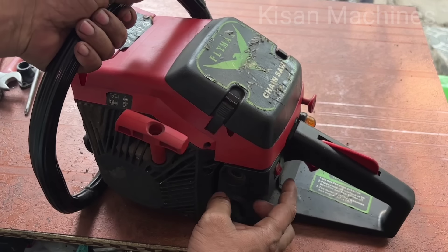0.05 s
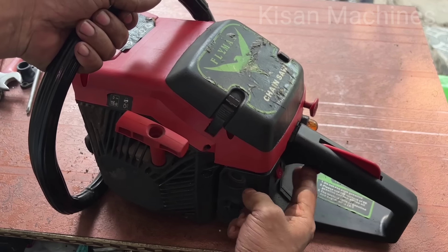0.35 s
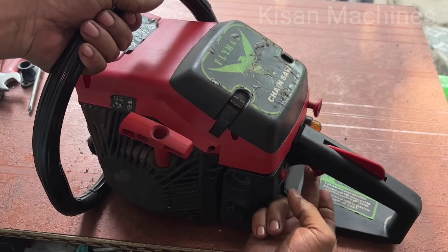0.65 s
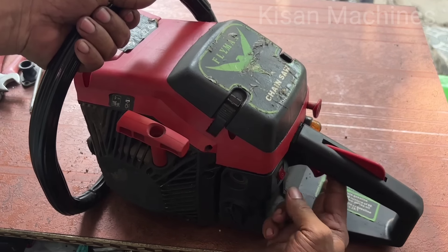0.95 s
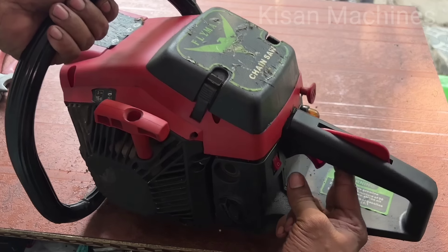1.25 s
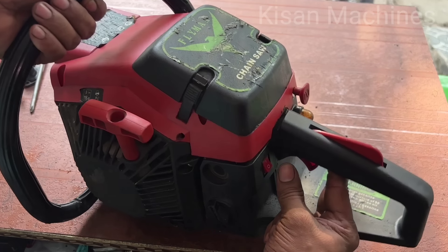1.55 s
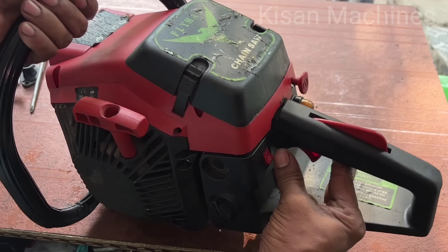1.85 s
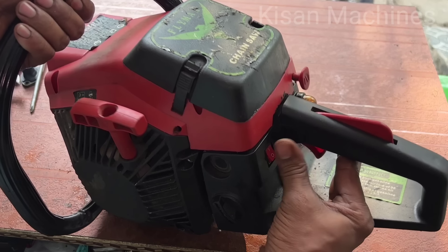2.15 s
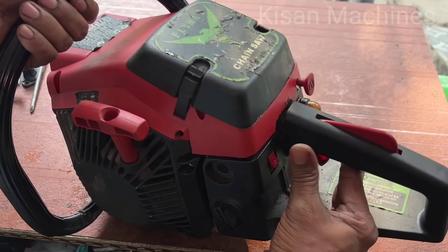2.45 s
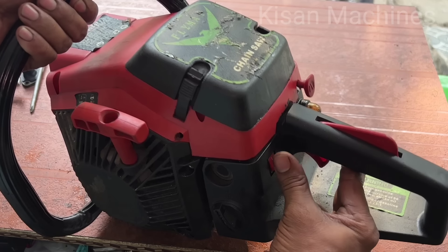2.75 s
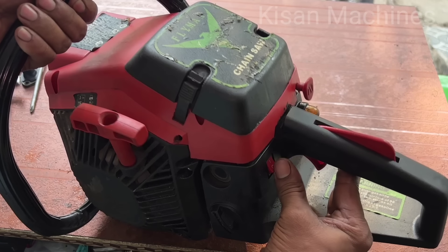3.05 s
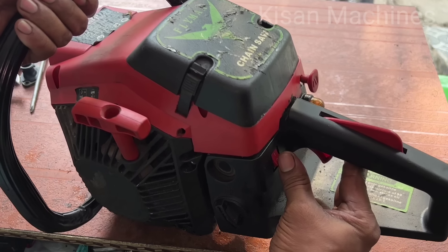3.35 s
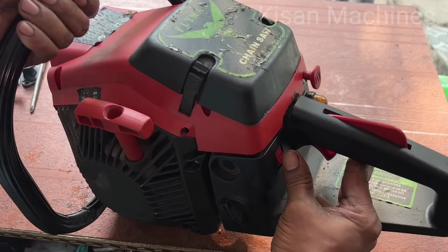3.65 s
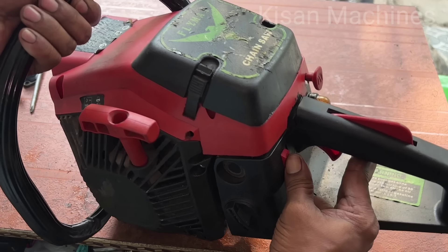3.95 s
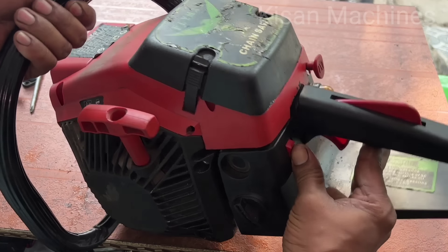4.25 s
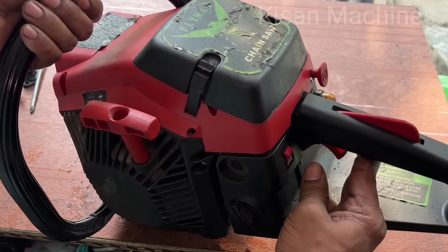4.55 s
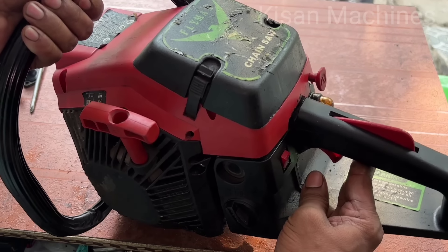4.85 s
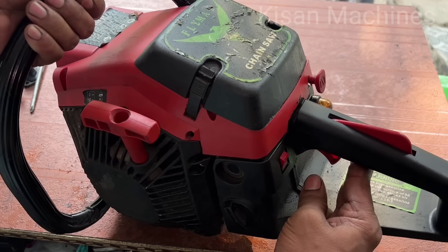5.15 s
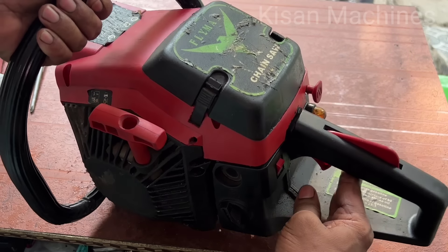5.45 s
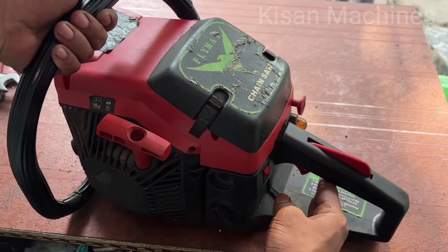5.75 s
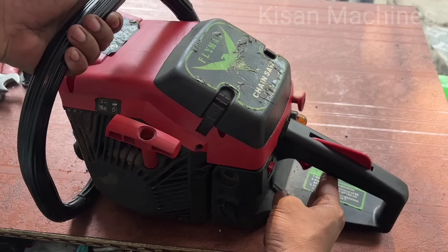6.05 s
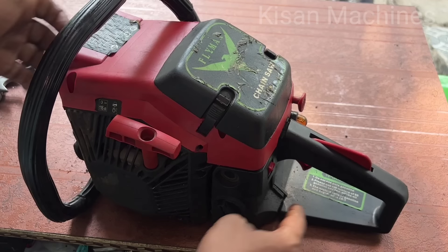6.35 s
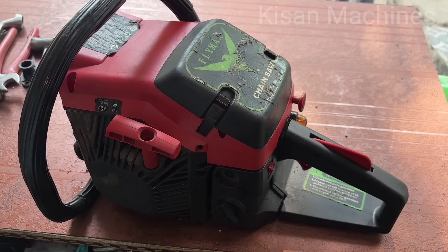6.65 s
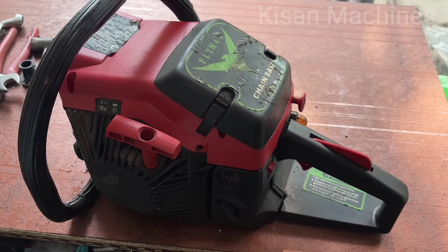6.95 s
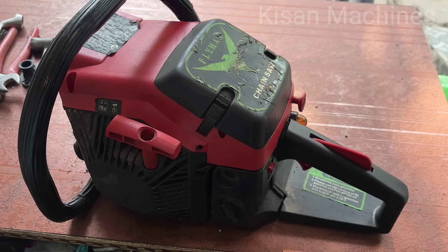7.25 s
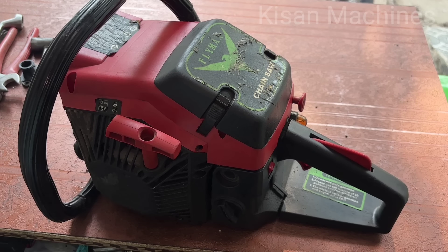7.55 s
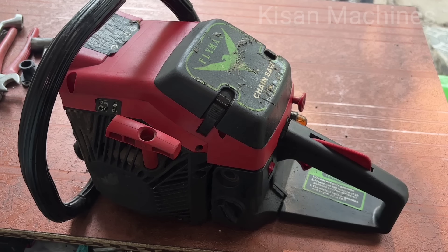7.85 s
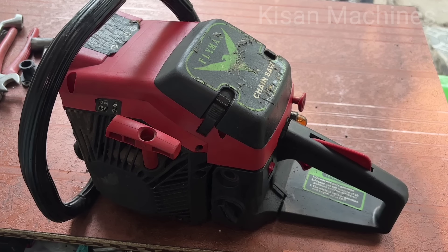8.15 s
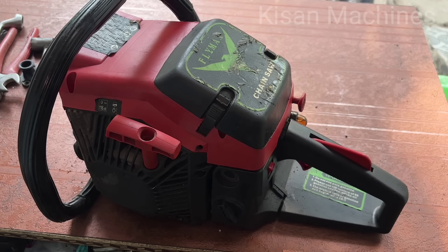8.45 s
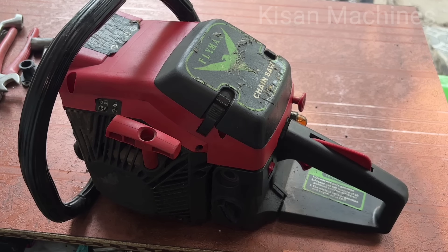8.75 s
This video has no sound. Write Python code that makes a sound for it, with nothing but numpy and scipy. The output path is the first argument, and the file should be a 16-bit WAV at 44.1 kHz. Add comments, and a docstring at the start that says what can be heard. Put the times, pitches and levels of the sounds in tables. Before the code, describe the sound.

Heard up close in a workshop, a chainsaw engine ticks over with a loping, clattering beat. The ignition is cut just before halfway, and the engine gulps air, drops in pitch and halts. Its loose clutch drum coasts on, rattling and ringing lightly. The saw is lowered onto the bench with a thud, and the rattle carries on with small irregular knocks above a low rumble.

```python
"""A two-stroke chainsaw idles close by on a workshop bench: it puffs through its muffler on every turn,
fires on every second or third, and clatters; its housing hops and makes the bench boom at first.
The ignition is cut, the crank pumps air, slows to a last compression and rocks back.
The free clutch drum coasts on, rattling on its bearing and ringing at its rim.
After soft handling bumps the saw is let down on the bench with a thud. A dull rumble lies underneath."""
import sys
import numpy as np
from scipy import signal
from scipy.fft import rfft, irfft, next_fast_len
from scipy.io import wavfile
from scipy.ndimage import map_coordinates

SR = 44100
rng = np.random.default_rng(int(sys.argv[2]) if len(sys.argv) > 2 else 0)


def generate_wav(sig):
    """Save sig (samples, or channels by samples) to the path in sys.argv[1] as 16-bit PCM at SR."""
    pcm = np.round(np.clip(np.atleast_2d(sig).T, -1, 1) * 32767).astype(np.int16)
    wavfile.write(sys.argv[1], SR, pcm)


N = 397323

CUT_S, LAST_COMPRESSION_S, REBOUND_S = 3.942, 4.294, 4.448
SET_DOWN_S, SET_DOWN_LENGTH_S = 5.67, 0.38
PUFF_DB, REBOUND_DB = -35.5, -8.5


def amp(db):
    """Decibels to gain."""
    return 10 ** (np.asarray(db) / 20)


def unit(x):
    """Scaled to rms 1."""
    return x / np.sqrt(np.mean(x ** 2) + 1e-20)


def along(points, hz):
    """Interpolates (frequency, value) points on a log axis."""
    f, v = np.transpose(points)
    return np.interp(np.log(hz + 1), np.log(f + 1), v)


def clock():
    """Sample times in seconds."""
    return np.arange(N) / SR


def ramp(start_s, length_s):
    """Rises from 0 to 1."""
    return np.clip((clock() - start_s) / length_s, 0, 1)


def wobble(rate_hz):
    """Smooth random curve with knots at rate_hz."""
    return map_coordinates(rng.standard_normal(int(N * rate_hz / SR) + 4), [clock() * rate_hz])


def spread(times):
    """One Gaussian draw per event."""
    return rng.standard_normal(len(times))


def filtered(x, response):
    """Applies a frequency response."""
    m = next_fast_len(N + SR // 2)
    return irfft(rfft(x, m) * response(np.fft.rfftfreq(m, 1 / SR)), m)[..., :N]


def body(x, colour, modes, size=8192):
    """Minimum-phase filter: resonances on a broad colour; white input keeps its power."""
    hz = np.fft.rfftfreq(size, 1 / SR)
    peaks_db = sum(rise / (1 + ((hz - centre) / width) ** 2) for centre, width, rise in modes)
    cepstrum = irfft(np.log(amp(along(colour, hz) + peaks_db)))[:size // 2]
    response = irfft(np.exp(rfft(2 * cepstrum, size)))
    return signal.fftconvolve(x, response / np.linalg.norm(response))[:N]


def taps(times, sizes):
    """Impulses of given sizes."""
    return np.bincount(np.clip(np.round(times * SR).astype(int), 0, N - 1), sizes, N)


def fade(x, life_s):
    """Gives each impulse an exponential tail."""
    return signal.lfilter([1], [1, -np.exp(-1 / (life_s * SR))], x)


def bursts(impulses, life_s):
    """Turns each impulse into a dying noise burst of equal energy."""
    return fade(impulses, life_s) * rng.standard_normal(N) * np.sqrt(2 / (life_s * SR))


def scattered(impulses, life_s):
    """Sends each impulse along the same short paths through the housing; energy is kept."""
    t = np.arange(SR // 16) / SR
    paths = rng.standard_normal(len(t)) * np.exp(-t / life_s)
    return signal.fftconvolve(impulses, paths / np.linalg.norm(paths))[:N]


def turn_times(speed_hz, through_s):
    """Times of whole turns, one of them at through_s."""
    turns = np.cumsum(speed_hz) / SR
    turns -= np.interp(through_s, clock(), turns)
    return np.interp(np.arange(np.ceil(turns[0]), turns[-1]), turns, clock())


def swell_db(db_per_s=1.2539):
    """The engine grows louder until the cut."""
    return db_per_s * np.minimum(clock(), CUT_S)


# Hunting idle: (time [s], crank speed [Hz])
IDLE_SPEED = [(0, 60.5), (.3, 61.7), (.6, 60), (.85, 61.4), (1.05, 62.6), (1.42, 61.8), (1.62, 58.8),
              (1.9, 61.2), (2.3, 60), (2.76, 64.3), (3.2, 60.5), (3.42, 61.3), (3.9, 60.9)]
# Turns that fire: (time [s], share [0-1])
FIRING_SHARE = [(0, .37), (.5, .38), (.65, .5), (.92, .5), (1.2, .4), (1.65, .34), (1.9, .44), (2.2, .46),
                (2.4, .33), (2.9, .38), (3.05, .5), (3.2, .46), (3.35, .34), (3.9, .43)]


def engine(brake_hz_per_s=131, escape_s=0.0024, jitter_s=.00009):
    """The crank idles, brakes evenly after the cut and rocks back once; its turns drive the parts."""
    t = clock()
    braking_s = np.clip(t - CUT_S, 0, LAST_COMPRESSION_S - CUT_S)
    speed_hz = np.interp(t, *np.transpose(IDLE_SPEED)) - brake_hz_per_s * braking_s
    times = turn_times(speed_hz, LAST_COMPRESSION_S)
    # trapped air escapes just after the piston turns back
    escapes = np.array([LAST_COMPRESSION_S, REBOUND_S]) + escape_s
    times = np.append(times[times < LAST_COMPRESSION_S - .01], escapes)
    running = times < CUT_S
    # charge builds turn by turn and burns when there is enough
    share = np.interp(times, *np.transpose(FIRING_SHARE))
    fired = (np.diff(np.floor(np.cumsum(share)), prepend=0) > 0) & running
    size = np.sqrt(SR / np.interp(times, t, speed_hz))
    powered = size * running
    times = times + jitter_s * spread(times)
    gas = exhaust(times, powered, fired, share) + pumping(times[~running], speed_hz)
    return (muffler_delay(gas) + port_pops(times, powered, fired)
            + casing(times, size, fired) + housing_hops(times, powered, fired))


# Muffler: (frequency [Hz], gain [dB])
MUFFLER_COLOUR = [(25, -59), (60, -14), (120, -11), (180, -4), (300, -4), (380, -10), (490, -13.5),
                  (650, -12), (720, -17.5), (950, -25.5), (1200, -26), (1500, -31.5), (2200, -53),
                  (4000, -36.5), (12000, -86)]
# Muffler resonances: (centre [Hz], half-width [Hz], rise [dB])
MUFFLER_MODES = [(295, 45, 2), (424, 22, 8), (550, 22, 12), (636, 25, 8), (765, 20, 4), (853, 14, 12),
                 (1040, 22, 13), (1095, 20, 5)]
# What a firing adds to a puff: (frequency [Hz], gain [dB])
LOPE_COLOUR = [(60, -5), (130, -4), (290, 7.5), (450, 6.5), (650, 2), (1100, -11)]
# Lead of a firing over the puff: (frequency [Hz], phase [rad])
LOPE_PHASE = [(130, 1.5), (230, 1.0), (330, 1.0), (450, 1.6), (650, 1.8)]


def exhaust(times, size, fired, share, scatter_db=.9, roughness=0.25):
    """One puff a turn, with gas noise, rings the muffler; the firings make the idle lope."""
    puffs = taps(times, size * amp(scatter_db * spread(times)))
    firings = taps(times, size * (fired - share))
    lope = filtered(firings, lambda hz: np.exp(1j * along(LOPE_PHASE, hz)) * amp(along(LOPE_COLOUR, hz)))
    gas = puffs + lope + roughness * bursts(puffs, life_s=.01)
    return amp(PUFF_DB + swell_db()) * body(gas, MUFFLER_COLOUR, MUFFLER_MODES)


# Muffler chambers: (centre [Hz], width [Hz])
CHAMBERS = [(280, 75), (480, 570), (800, 360)]


def muffler_delay(gas):
    """Each chamber delays sound near its resonance, so a puff swells over a few cycles."""
    def lag_rad(hz):
        return 2 * sum(np.angle(centre ** 2 - hz ** 2 + 1j * hz * width) for centre, width in CHAMBERS)
    return filtered(gas, lambda hz: np.exp(-1j * lag_rad(hz)))


def port_pops(times, size, fired, relative_db=-16, fired_db=3):
    """The exhaust port pops open on each powered turn, harder on a firing."""
    openings = taps(times, size * amp(fired_db * fired))
    blasts = .6 * scattered(openings, 0.005) + .7 * bursts(openings, 0.008)
    pops = body(blasts, MUFFLER_COLOUR, modes=[(1473, 440, 17.6)])
    return amp(PUFF_DB + swell_db() + relative_db) * pops


# Casing hiss: (frequency [Hz], gain [dB])
CASING_COLOUR = [(200, -5), (700, 23), (1200, 10), (1900, -5), (2500, 4), (3600, 3), (5000, 1.5), (6000, 1),
                 (7500, -4), (10000, -1), (15000, -9.5)]
# Casing resonances: (centre [Hz], half-width [Hz], rise [dB])
CASING_MODES = [(1876, 260, 19.1), (3247, 170, 9.3), (3525, 28, 7.5), (3744, 13, 9.6), (4220, 71, 5),
                (5200, 130, 10.6), (7530, 88, 6.8), (7450, 44, 3.4)]


def casing(times, size, fired, start_db=-46.5, slap_gain=0.54, scatter_db=2.5, fired_db=3.5):
    """Steady rush of the flywheel fan and bursts of piston slap ring the casing."""
    fan = 0.77 * rng.standard_normal(N) * (1 - ramp(LAST_COMPRESSION_S, 0.52))
    impacts = taps(times, size * amp(scatter_db * spread(times) + fired_db * fired - 1.5))
    slap = slap_gain * (.5 * scattered(impacts, 0.013) + 1.05 * bursts(impacts, 0.012))
    braking_db = -6 * ramp(CUT_S, LAST_COMPRESSION_S - CUT_S)
    rebound_db = REBOUND_DB * ramp(LAST_COMPRESSION_S, REBOUND_S - LAST_COMPRESSION_S)
    level_db = start_db + swell_db() + braking_db + rebound_db
    return amp(level_db) * body(fan + slap, CASING_COLOUR, CASING_MODES)


# Hopping of the housing: (time [s], level [dB])
HOP_LEVEL = [(0, -40.5), (.55, -40), (.8, -36), (.98, -37.5), (1.25, -44), (1.7, -44.5)]
# Housing on the bench: (frequency [Hz], gain [dB])
HOUSING_COLOUR = [(30, -13), (70, -9.5), (120, 1.5), (200, -1), (320, 4.5), (700, -8.5), (1300, -10.5),
                  (2000, -25.5), (4000, -25.5), (12000, -36.5)]
# Housing resonance: (centre [Hz], half-width [Hz], rise [dB])
HOUSING_MODES = [(1735, 40, 15.3)]


def housing_hops(times, size, fired, fired_db=4):
    """The housing lands and buzzes on the bench, harder after a firing, less as the grip tightens."""
    hop = spread(times)
    landings = taps(times + .004 + .0003 * hop, size * amp(.5 * hop + fired_db * fired))
    buzz = .6 * landings + .8 * bursts(landings, .009)
    return amp(np.interp(clock(), *np.transpose(HOP_LEVEL))) * body(buzz, HOUSING_COLOUR, HOUSING_MODES)


# Bench note: (time [s], frequency [Hz], level [dB])
BOOM_NOTE = [(0, 120.6, -42.5), (.65, 110, -50.5), (1.08, 108.6, -41), (1.22, 79, -45), (1.33, 72, -67)]


def bench_boom(width_hz=22):
    """The loosely held saw makes the bench boom; the note sinks and dies as the grip tightens."""
    s, hz, db = np.transpose(BOOM_NOTE)
    angle = 2 * np.pi * np.cumsum(np.interp(clock(), s, hz)) / SR
    note = unit(wobble(width_hz) * np.cos(angle) + wobble(width_hz) * np.sin(angle))
    return note * amp(np.interp(clock(), s, db)) * (1 - ramp(s[-1], .1))


# Hardest bearing knocks: (time [s], level [dB])
BEARING_KNOCKS = [(5.19, -43), (5.222, -41), (5.62, -39), (6.18, -40), (6.25, -43), (6.299, -42),
                  (6.447, -43), (6.627, -42), (6.757, -42), (6.919, -39), (6.989, -38), (7.071, -40),
                  (7.133, -39), (7.208, -38), (7.441, -38), (7.529, -37), (7.614, -38), (7.689, -37),
                  (7.838, -42), (7.928, -40), (7.986, -40), (8.058, -41), (8.2, -40), (8.262, -42),
                  (8.321, -41), (8.496, -40), (8.522, -41), (8.575, -42), (8.73, -39), (8.824, -40),
                  (8.894, -40)]
# Bearing rattle: (frequency [Hz], gain [dB])
RATTLE_COLOUR = [(100, -18), (250, -3), (600, -13.5), (1000, -16.5), (1400, -15.5), (2300, -15),
                 (3500, -21), (6000, -9), (14000, -76)]
# Rattle resonances: (centre [Hz], half-width [Hz], rise [dB])
RATTLE_MODES = [(476.3, 81.4, 27.6), (861.5, 198, 27.8), (1817, 190, 26), (2264, 105, 17.6), (2780, 93, 15),
                (2930, 72, 21.6)]


def bearing_rattle(contacts, speed_hz, held_db=-57.5, resting_db=-52, knock_db=18, dull_hz=1570):
    """The drum rolls and knocks on its bearing; after the set-down the bench carries the rattle."""
    rolling = 0.23 * contacts + 0.84 * bursts(contacts, 0.011) + 0.73 * rng.standard_normal(N)
    # slower contacts are softer and lose treble
    soft = filtered(rolling, lambda hz: 1 / (1 + (hz / dull_hz) ** 4))
    rolling = soft + speed_hz / 33 * (rolling - soft)
    s, db = np.transpose(BEARING_KNOCKS)
    blows = taps(s, amp(db + knock_db))
    knocks = .45 * blows + .75 * bursts(blows, .008)
    rolling_db = held_db + (resting_db - held_db) * ramp(SET_DOWN_S, SET_DOWN_LENGTH_S)
    return body(amp(rolling_db) * rolling + knocks, RATTLE_COLOUR, RATTLE_MODES)


# Steel rim: (frequency [Hz], gain [dB])
RIM_COLOUR = [(2000, 2.5), (4000, -1.5), (9000, -13.5), (15000, -24)]
# Rim resonances: (centre [Hz], half-width [Hz], rise [dB])
RIM_MODES = [(4220, 63, 6.6), (4530, 65, 3), (5080, 190, 19), (7040, 160, 23.9), (7700, 180, 8),
             (9160, 230, 15), (13650, 850, 16)]


def rim_ring(contacts, speed_ratio, gain_db=-60):
    """Contacts and flickering noise ring the drum's rim, more faintly as it slows."""
    drive = .5 * bursts(contacts, 0.017) + 0.59 * amp(2.8 * wobble(22)) * rng.standard_normal(N)
    return amp(gain_db) * speed_ratio ** 0.52 * body(drive, RIM_COLOUR, RIM_MODES)


def clutch_drum(start_hz=55.35, drag_s=9.0, friction_hz_per_s=5.8, scatter_db=2.5):
    """The drum wobbles on its bearing, louder once free; viscous drag and dry friction slow it."""
    friction_hz = friction_hz_per_s * drag_s
    coasted_s = np.maximum(clock() - LAST_COMPRESSION_S, 0)
    speed_hz = np.maximum((start_hz + friction_hz) * np.exp(-coasted_s / drag_s) - friction_hz, 1)
    times = turn_times(speed_hz, through_s=7.44)
    period_s = 1 / np.interp(times, clock(), speed_hz)
    size = np.sqrt(SR * period_s)
    contacts = taps(times + period_s * 0.076 * spread(times), size * amp(scatter_db * spread(times)))
    # it falls against the other side about half a turn later
    fall_times = times + period_s * (.5 + 0.13 * spread(times))
    contacts += taps(fall_times, size * amp(scatter_db * spread(times) - 11))
    free = np.interp(clock(), [CUT_S, LAST_COMPRESSION_S], [.3, 1])
    return free * (bearing_rattle(contacts, speed_hz) + rim_ring(contacts, speed_hz / start_hz))


# Broad rumble: (frequency [Hz], gain [dB])
BROAD_COLOUR = [(25, -22), (65, 2), (130, 1), (180, -0.5), (235, 6.5), (280, 0.5), (400, -2.5),
                (1000, -9.5), (3000, -19), (15000, -37)]
# Deep rumble: (frequency [Hz], gain [dB])
DEEP_COLOUR = [(25, -32), (70, 1.5), (110, -6), (200, -4), (350, -11), (1000, -53), (4000, -80)]


def rumble(held_db=-69.5, resting_db=-54.5, deep_db=-66.5, swell_db_per_s=5, waver_db=1.5):
    """Dull, uneven rumble: the broad part steps up at the set-down, the deep part swells steadily."""
    broad = unit(filtered(rng.standard_normal(N), lambda hz: amp(along(BROAD_COLOUR, hz))))
    deep = unit(filtered(rng.standard_normal(N), lambda hz: amp(along(DEEP_COLOUR, hz))))
    broad *= amp(held_db + (resting_db - held_db) * ramp(SET_DOWN_S, SET_DOWN_LENGTH_S))
    deep *= amp(deep_db + swell_db_per_s * (clock() - SET_DOWN_S))
    return (broad + deep) * amp(-waver_db * wobble(9.2))


# Clutch and housing clacks: (time [s], level [dB])
CLACKS = [(0.236, -33), (0.3346, -45), (0.548, -33.5), (1.1522, -40), (1.396, -38), (1.574, -39.5),
          (1.8753, -38), (2.024, -34.5), (2.173, -36.5), (2.288, -38), (2.388, -32), (2.435, -33.5),
          (2.4843, -37), (2.581, -42), (2.647, -33), (2.69, -30.5), (2.896, -33), (3.041, -40),
          (3.173, -36.5), (3.254, -40), (3.3051, -30), (3.3523, -35), (3.4515, -38.5), (3.549, -34),
          (3.598, -31.5), (3.762, -36), (3.845, -34.5), (3.92, -51), (4.231, -38), (4.293, -31.5),
          (4.4044, -35.5), (4.4463, -37.5)]
# Clack spectrum: (frequency [Hz], gain [dB])
CLACK_COLOUR = [(200, -1), (800, 16), (1800, 10.5), (3300, 13), (6000, 12.5), (9000, 7.5), (15000, 9)]
# Steel resonances: (centre [Hz], half-width [Hz], rise [dB])
STEEL_MODES = [(1950, 200, 8), (3310, 120, 10), (3540, 100, 10), (3770, 50, 6), (4200, 100, 6),
               (5060, 180, 8), (7350, 200, 4)]


def clacks(crack_db=18, ring_db=21.5):
    """Loose metal and plastic parts snap together with a crack; before the cut the steel rings too."""
    s, db = np.transpose(CLACKS)
    crack = body(bursts(taps(s, amp(db)), life_s=.004), CLACK_COLOUR, CASING_MODES)
    ring = body(bursts(taps(s, amp(db) * (s < CUT_S)), life_s=.016), CLACK_COLOUR, STEEL_MODES)
    return amp(crack_db) * crack + amp(ring_db) * ring


# Unfired muffler, led by its lowest resonance: (frequency [Hz], gain [dB])
PUMPING_COLOUR = [(25, -54), (60, -18), (120, -6), (210, 2), (300, 4), (380, 3.5), (450, 2.5), (620, 3.5),
                  (720, -12), (950, -16), (1400, -30), (3000, -48), (12000, -94)]
# Its resonances: (centre [Hz], half-width [Hz], rise [dB])
PUMPING_MODES = [(297, 60, 9.1), (1050, 26, 19)]


def pumping(times, speed_hz, gain_db=-27, weak_below_hz=32.5, weak_db_per_hz=0.25, dull_hz=290):
    """The slowing, unfired piston pumps gulps of air that grow duller and weaken near the stall."""
    rebound_db = REBOUND_DB * ramp(LAST_COMPRESSION_S, REBOUND_S - LAST_COMPRESSION_S)
    level_db = gain_db + rebound_db - weak_db_per_hz * np.maximum(weak_below_hz - speed_hz, 0)
    gulps = taps(times, np.sqrt(SR / speed_hz[0]) * amp(np.interp(times, clock(), level_db)))
    gulps += .3 * bursts(gulps, life_s=.04)  # air swirls on after the stroke
    flow = np.clip(speed_hz / speed_hz[0], 0, 1) ** 1.84
    dull = filtered(gulps, lambda hz: 1 / (1 + (hz / dull_hz) ** 4))
    return body(flow * gulps + 1.86 * (1 - flow) * dull, PUMPING_COLOUR, PUMPING_MODES)


# Crank stop: (frequency [Hz], gain [dB])
STOP_COLOUR = [(100, -48), (400, -15), (800, 4), (1400, 0), (2200, -14), (4000, -4), (9000, -9),
               (13000, -2), (15000, 2)]


def stop_clack(gain_db=-9):
    """The crank halts against its last compression with a dry clack."""
    impact = taps(np.array([LAST_COMPRESSION_S]), [amp(gain_db)])
    return body(bursts(impact, life_s=0.01), STOP_COLOUR, CASING_MODES[:1])


# Handling bumps, then the set-down thud: (time [s], level [dB], contact softness [s])
BUMPS_AND_THUD = [(5.279, -54, 0.005), (5.423, -50, 0.0036), (5.496, -50, 0.003), (5.58, -58, .006),
                  (5.918, -42, 0.000044), (5.93, -39, 0.00053), (5.944, -39, 0.0022), (5.975, -43, .005)]
# Bench top: (frequency [Hz], gain [dB])
BENCH_COLOUR = [(30, -35), (70, 2), (110, 0.5), (300, 6), (700, -5), (1300, -3), (2000, -23.5), (4000, -32),
                (12000, -42)]
# Bench resonances: (centre [Hz], half-width [Hz], rise [dB])
BENCH_MODES = [(118, 28, 14.5), (335, 73, 1.3), (1753, 11.7, 11.5)]


def bumps_and_thud(gain_db=26):
    """Soft, low handling bumps, then the saw thuds onto the bench; softer contacts sound deeper."""
    force = np.zeros(N)
    for s, db, soft_s in BUMPS_AND_THUD:
        blow = fade(taps(np.array([s]), [amp(db)]), soft_s)
        force += blow * np.hypot(1, soft_s * 1200) / np.hypot(1, soft_s * SR)
    return amp(gain_db) * body(force, BENCH_COLOUR, BENCH_MODES)


# Wall echo decay: (frequency [Hz], T60 [s])
WALL_T60 = [(100, .25), (300, .12), (1000, 0.06), (4000, 0.07), (15000, 0.04)]
# Echo relative to direct sound: (frequency [Hz], gain [dB])
ECHO_GAIN = [(60, -24), (250, -18), (600, -10), (2000, -8), (5000, -7), (14000, -10)]
# Lead of left over right: (frequency [Hz], phase [rad])
LEFT_LEAD = [(60, 0.057), (250, 0.088), (500, 0.51), (1200, 0.45), (2800, 1.67), (4500, 1.3), (7700, 5.74),
             (11000, 9.53), (15000, 14.4)]
# Left minus right: (frequency [Hz], gain [dB])
LEFT_TILT = [(250, -0.5), (600, -1.5), (1400, -0.5), (3000, -2), (6000, -0.5)]


def workshop(x, echo_delay_samples=SR // 200):
    """Left and right get the direct sound slightly apart, each with its own short wall echo."""
    hz, t, noise = signal.stft(rng.standard_normal((2, SR // 4)), SR, nperseg=256)
    t60_s = along(WALL_T60, hz)[:, None]
    decay = amp(-60 * t / t60_s) * np.sqrt(2 * np.log(1000) / (t60_s * SR))
    tail = signal.istft(noise * decay, SR, nperseg=256)[1]
    echo = signal.fftconvolve(np.pad(x, (echo_delay_samples, 0))[None], tail, axes=1)[:, :N]
    sides = np.array([[.5], [-.5]])
    direct = filtered(
        x, lambda f: amp(sides * along(LEFT_TILT, f)) * np.exp(1j * sides * along(LEFT_LEAD, f)))
    return direct + filtered(echo, lambda f: amp(along(ECHO_GAIN, f)))


def scene():
    """Saw, bench and rumble in the workshop."""
    sources = engine() + bench_boom() + clutch_drum() + rumble() + clacks() + stop_clack()
    return workshop(sources + bumps_and_thud())


def record(dry, top_hz=15600):
    """Brick-wall low-pass."""
    return filtered(dry, lambda hz: hz < top_hz)


dry = scene()
out = record(dry)
generate_wav(out)
```